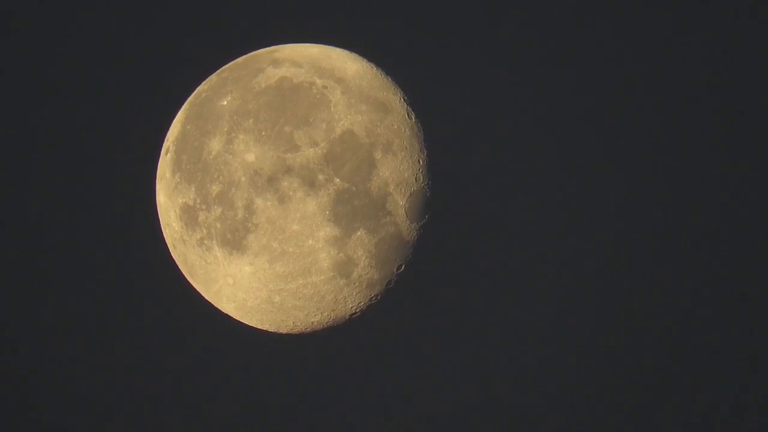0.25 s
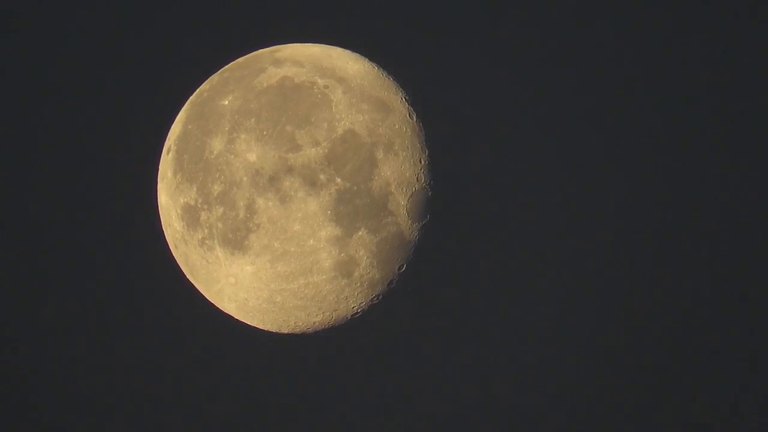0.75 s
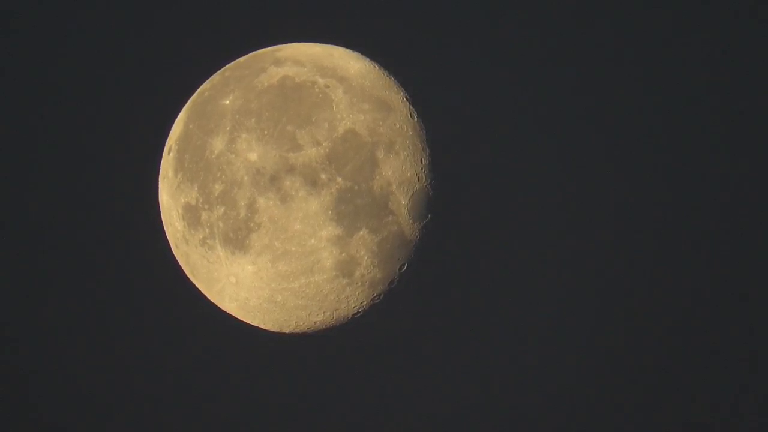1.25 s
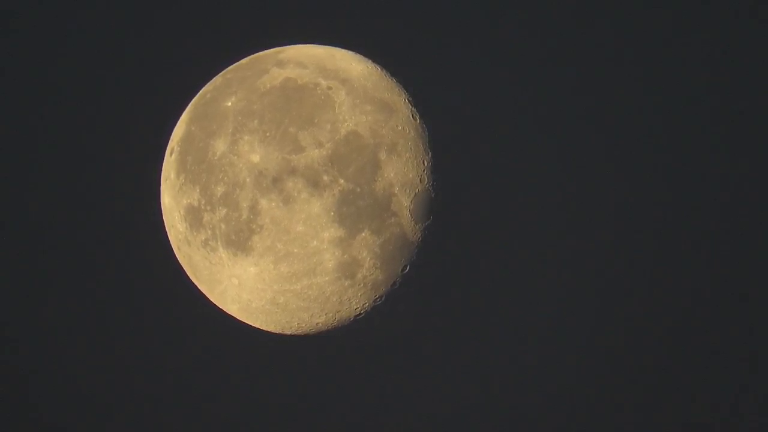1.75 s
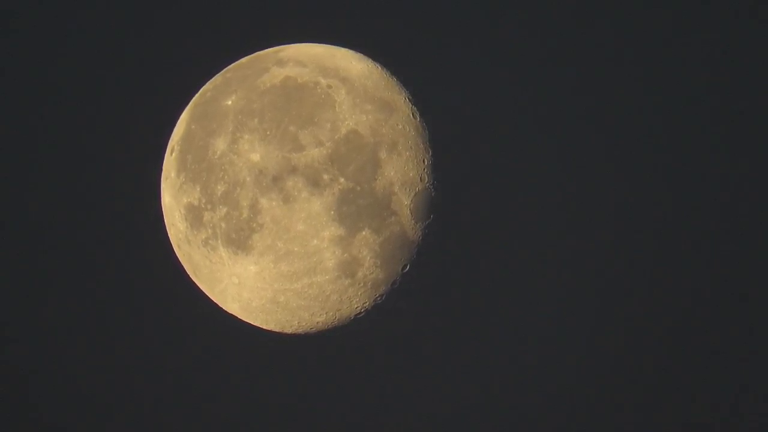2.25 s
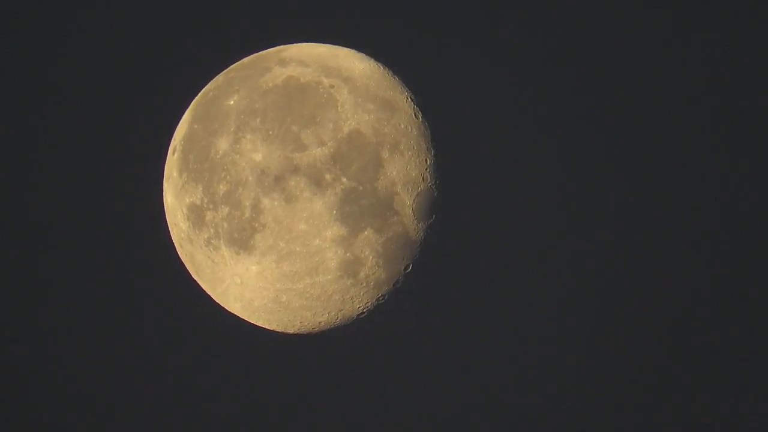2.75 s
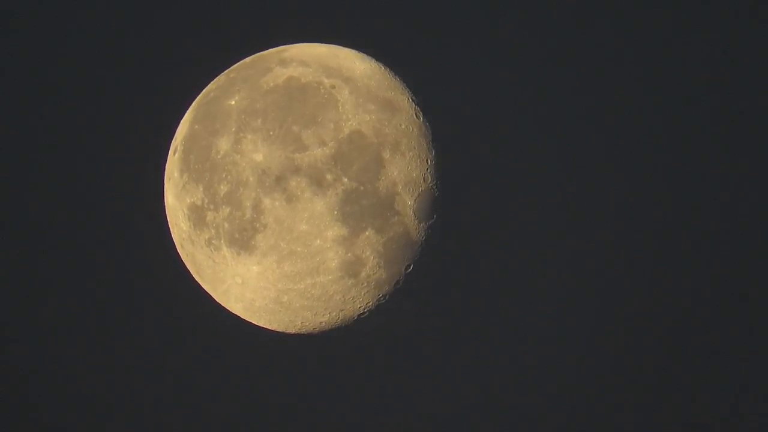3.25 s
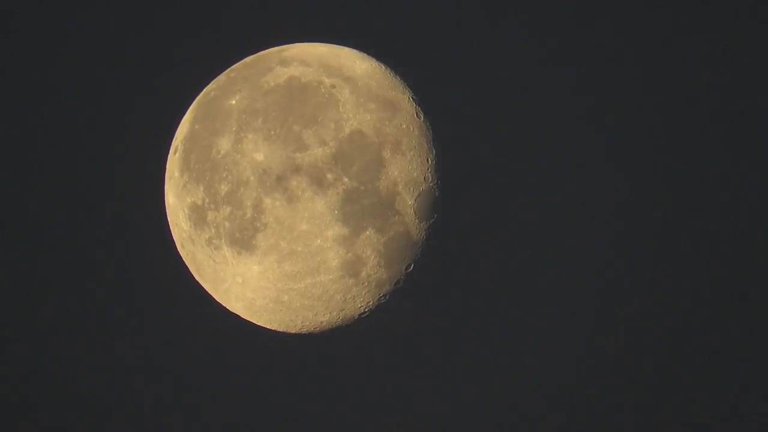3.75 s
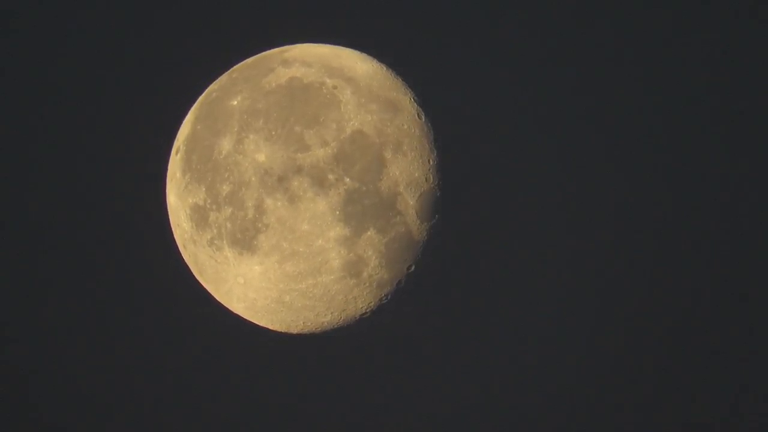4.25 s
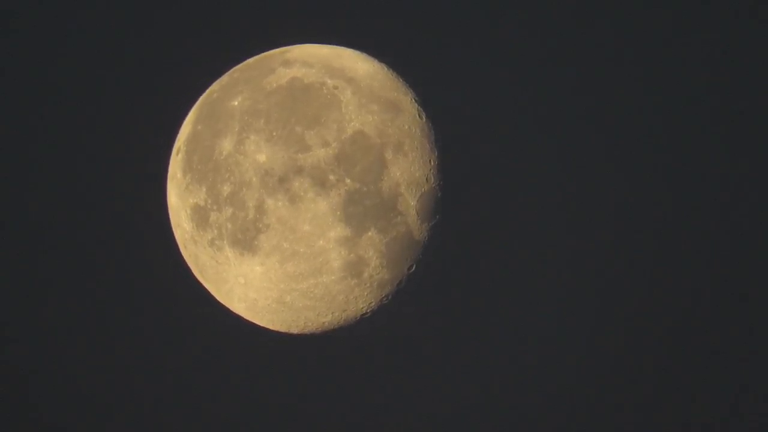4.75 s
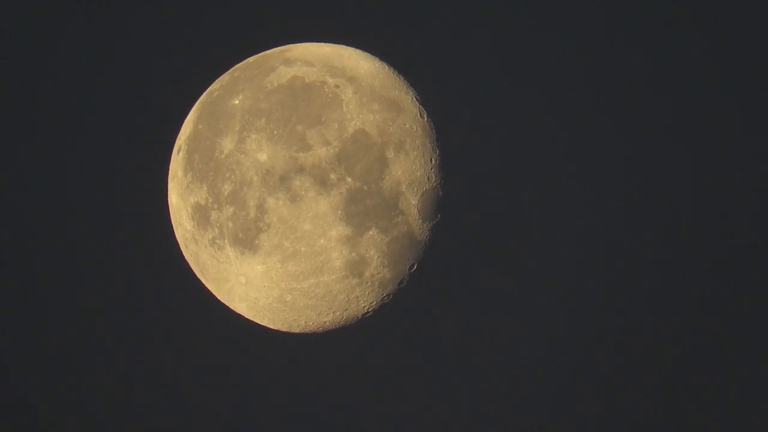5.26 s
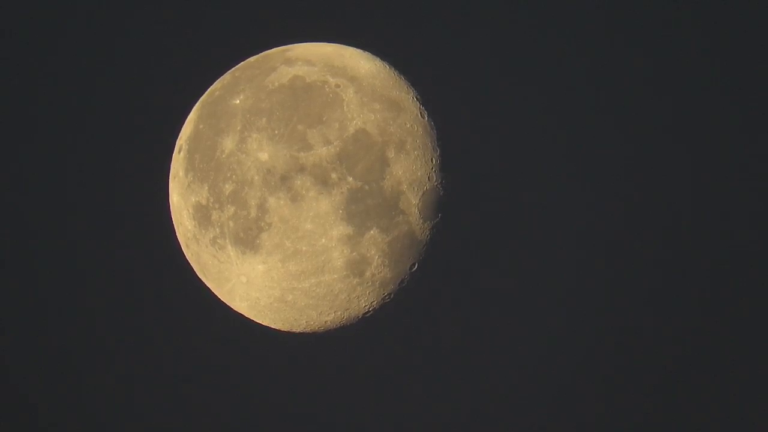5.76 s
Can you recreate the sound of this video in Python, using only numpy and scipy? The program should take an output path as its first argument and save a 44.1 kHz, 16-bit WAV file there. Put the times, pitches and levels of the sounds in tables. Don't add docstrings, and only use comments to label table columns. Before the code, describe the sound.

After a tiny silence, the low, broad hum of far town traffic opens quickly and continues throughout: soft rumble, tyre roar and faint hiss, without distinct vehicles. A gull calls at about 0.7, 1.5, 2.5, 4.2 and 5.8 seconds. Each call is a clear, whistling yelp under a fifth of a second long, sliding up around 2.3 to 2.7 kHz, breaking to about 3 kHz, then dropping towards 2 kHz. House fronts return it within half a second as fainter, slightly higher, smeared copies, and a streaky reverberant haze hangs on for a second or more. The third call is weaker; the fourth has a strong early echo. At 4.9 seconds a hard, dry knock of several almost merged taps clicks nearby with a brief ring. Traffic swells slightly around 5.2 seconds, eases, and rises again as the faint last call ends the scene at 6 seconds.

```python
import sys
import numpy as np
from scipy import signal
from scipy.fft import rfft, irfft
from scipy.io import wavfile
from scipy.ndimage import uniform_filter1d

SR = 44100
rng = np.random.default_rng(int(sys.argv[2]) if len(sys.argv) > 2 else 0)


def inscribe(sig):
    pcm = np.round(np.clip(np.atleast_2d(sig).T, -1, 1) * 32767)
    wavfile.write(sys.argv[1], SR, pcm.astype(np.int16))


def invert_db(x):
    u = np.asarray(x, float) / 20
    return 10 ** u


N = 264908

# multiples of the pitch curve, strength toward walls/dB, change from mid-part to its end/dB
CALL_PARTS = [
    ((1, 1.5, 2, .5), (0.5, -5, -24.5, -14), (7.3, -0.5, 4, -2)),
    ((1, 2), (0.19, -22), (-4, 4)),
    ((1, 1.5, 2, 2.5), (-0.5, -11, -22, -27), (-4.5, -1, -3, 4)),
]
# (level/dB, loudest at share of part, loss/dB)
STRAIGHT_VOICE = [
    (0.94, 30, [(-4, 0.44, 82), (-23, 0.63, 40), (-3.5, 0.55, 37)]),
    (2.0, 53, [(-18.5, 0.65, 30)]),
    (1.15, 21, [(-14, 0.22, 25), (-25, .05, 61), (-28.5, 0.59, 70)]),
]


def gull():
    # start t/s, voice breaks up t/s, drops back t/s, end t/s
    call_times = [
        (.674, .72, .771, .834),
        (1.492, 1.539, 1.609, 1.7),
        (2.53, 2.592, 2.648, 2.7),
        (4.238, 4.284, 4.356, 4.405),
        (5.782, 5.833, 5.876, 5.91),
    ]
    # from f/Hz, to f/Hz, level/dB, loudest at share of part, other partials/dB
    rises = [(2403, 2630, -47.5, 0.78, -0.5), (2325, 2660, -46, 0.91, 1), (2290, 2660, -49.5, 1, -3),
             (2314, 2690, -47.5, 0.9, 0), (2360, 2700, -49, 1, -8)]
    # from f/Hz, to f/Hz, level/dB, loudest at share of part, other partials/dB
    tops = [(3100, 2900, -43, 0.74, -1.5), (3196, 2800, -47, 0.46, -7), (3106, 2900, -63, .4, 7.),
            (3257, 2880, -47, .3, 0.5), (3220, 2950, -59.5, .65, 4.)]
    # from f/Hz, to f/Hz, level/dB, loudest at share of part, other partials/dB
    falls = [(2357, 2135, -44, 0.65, 0), (2300, 1990, -40.5, 0.062, -1.5), (2396, 2135, -50.5, .75, 0),
             (2280, 2095, -40.5, .0, -8.), (2420, 2170, -59, .4, -1.5)]
    direct = np.zeros(N)
    calls = []
    for times, *rows in zip(call_times, rises, tops, falls):
        parts = glides(times, *rows)
        calls.append(parts)
        cry(direct, parts, rows)
    near = tail(.3, [(2000, 0.78), (6000, 0.18)], onset=0.0053, same=.4)
    ground = invert_db(-13) * signal.oaconvolve(direct[None], near, axes=1)[:, :N]
    walls = house_fronts(calls, [top[3] for top in tops])
    straight = placed(direct, pan_db=1.5, lag=0.1)
    return straight + ground + placed(walls, pan_db=-1.0, lag=1.26) + streets(calls)


def glides(times, *rows):
    scoops_hz = [
        0,
        110.,
        0,
    ]
    overlap_s = 0.0049
    scoop_share = 0.083
    collapse_hz, collapse = 2130, 2.5
    u = np.linspace(0, 1, 17)
    curves = []
    for a, b, row, (bend, *_), scoop_hz in zip(times, times[1:], rows, STRAIGHT_VOICE, scoops_hz):
        s = a + u * (b - a + overlap_s)
        hz = row[0] + (row[1] - row[0]) * u ** bend
        hz = hz - scoop_hz * np.exp(-u / scoop_share)
        hz = hz - collapse * np.maximum(collapse_hz - hz, 0)
        curves.append(np.transpose([s, hz]))
    return curves


def cry(direct, parts, rows):
    for row, glide, (multiples, *_), (_, lost_db, others) in zip(rows, parts, CALL_PARTS, STRAIGHT_VOICE):
        *_, level_db, peak, rich_db = row
        s, hz = glide.T
        t = np.arange(s[0], s[-1], 1 / SR)
        u = np.linspace(0, 1, len(t))
        dbs = [level_db - lost_db * (u - peak) ** 2]
        for db, at, lost in others:
            dbs.append(level_db + rich_db + db - lost * (u - at) ** 2)
        tone = note(np.interp(t, s, hz), multiples, dbs)
        add(direct, s[0], tone * signal.windows.tukey(len(t), .18))


def note(hz, multiples, dbs, wobble=0.0036):
    flutter_db = 1.6
    chance = rng.standard_normal((5, 8000))
    drift = evened(uniform_filter1d(chance[0], 150))
    hz = hz * (1 + wobble * drift[:len(hz)])
    flicker = uniform_filter1d(uniform_filter1d(chance[1:], 250), 250)[:, :len(hz)]
    turns = np.cumsum(hz) / SR
    tone = np.zeros(len(hz))
    for k, db, f in zip(multiples, dbs, flicker):
        level = invert_db(db + flutter_db * evened(f - f.mean()))
        tone += level * np.sin(2 * np.pi * k * turns)
    return np.sqrt(2) * tone


def house_fronts(calls, top_peaks):
    # delay t/s, pitch factor, rise level/dB, top level/dB, fall level/dB
    fronts = [
        [(.11, 1.0, -58, -53, -58), (.195, 1.0, -61, -55, -60), (.236, 1.04, -52.5, -47, -48.5),
         (.262, 1.05, -54, -49.5, -56), (.46, 1.02, -55, -56, -56.5)],
        [(.11, 1.1, -61, -65, -55), (.194, 1.03, -54, -53, -55), (.228, 1.04, -52.5, -50, -52),
         (.444, 1.04, -56, -60, -57)],
        [(.12, 1.01, -59, -65, -58), (.17, 1.03, -58.5, -57, -53), (.195, 1.04, -54, -49, -52),
         (.33, 1.01, -58, -68, -57), (.41, 1.04, -59, -65, -53.5)],
        [(.055, 1.02, -63, -56, -51), (.111, 1.04, -47.5, -39.5, -49.5), (.148, 1.02, -59, -59, -54),
         (.3, 1.01, -71, -61.5, -62), (.37, 1.03, -60, -66, -62)],
        [(.07, 1.038, -74, -67, -68)],
    ]
    walls = np.zeros(N)
    for parts, peak, echoes in zip(calls, top_peaks, fronts):
        fade_db = -2.5 + 25 * (peak - .5)
        for delay, shift, *dbs in echoes:
            bounced = sent(parts, shift, dbs, fade_db)
            echo = signal.fftconvolve(bounced, ledges(smear=.07 * delay))
            add(walls, parts[0][0][0] + delay, echo)
    return walls


def sent(parts, shift, dbs, fade_db=0.0):
    sag_hz = 2140
    first, out = parts[0][0][0], np.zeros(SR // 4)
    for glide, (multiples, toward_db, swell_db), db, fade in zip(parts, CALL_PARTS, dbs, (0, fade_db, 0)):
        s, hz = np.transpose(glide)
        t = np.arange(s[0], s[-1], shift / SR)
        along = np.linspace(-1, 1, len(t))
        pitch = np.interp(t, s, hz)
        levels_db = db + fade * along + np.array(toward_db)[:, None] + np.outer(swell_db, along)
        levels_db = levels_db - 0.054 * np.maximum(sag_hz - pitch, 0)
        tone = note(shift * pitch, multiples, levels_db)
        add(out, (s[0] - first) / shift, tone * signal.windows.tukey(len(t), .4))
    return out


def ledges(smear):
    fade = np.exp(-np.arange(4000) / SR / max(smear, .002))
    taps = rng.standard_normal(4000) * (rng.random(4000) < .02) * fade
    taps[0] = 1.8
    return taps / np.linalg.norm(taps)


def streets(calls):
    shifts = (.97, .99, 1.01, 1.03, 1.045)
    # delay t/s, rise level/dB, top level/dB, fall level/dB
    tails = [(.21, -53, -52.5, -52.5), (.19, -53.5, -53, -53), (.18, -54.5, -57.5, -50),
             (.12, -56, -55, -54), (.06, -67, -66, -66)]
    # f/Hz, time to fall 60 dB t/s
    ringing = [(1200, 2.4), (2400, 2.6), (3300, 2.3), (4500, 1.2), (7000, .5)]
    out = np.zeros((2, N))
    for shift in shifts:
        feed = np.zeros(N)
        for parts, (delay, *dbs) in zip(calls, tails):
            add(feed, parts[0][0][0] + delay, sent(parts, shift, dbs))
        far = tail(1.2, ringing, onset=0.031, same=0.31)
        chance = rng.standard_normal(far.shape[1])
        lumps = evened(uniform_filter1d(uniform_filter1d(chance, 500), 500))
        far = far * invert_db(4.5 * np.clip(lumps, -2, 2) - 9)
        out += signal.oaconvolve(feed[None], far, axes=1)[:, :N]
    return out


def knock():
    # t/s, level/dB
    tap_times = [
        (4.873, -42),
        (4.877, -40.5),
        (4.88, -39),
        (4.886, -45),
        (4.906, -49),
    ]
    # f/Hz, level per Hz/dB
    tap_colour = [(500, -28), (1000, -18), (1450, 4), (2200, -5), (3600, -6), (5400, -14.5), (6400, -23),
                  (7500, -40), (22000, -90)]
    taps = np.zeros(N)
    fade = np.exp(-np.arange(400) / SR / 0.0034)
    for s, db in tap_times:
        add(taps, s, invert_db(db) * evened(rng.standard_normal(400)) * fade)
    grid = np.linspace(0, 1, 129)
    gains = invert_db(2 * read(tap_colour, grid * SR / 2))
    colour = signal.minimum_phase(signal.firwin2(255, grid, gains))
    taps = signal.oaconvolve(taps, colour / np.linalg.norm(colour))[:N]
    ring = tail(.3, [(1500, 0.31), (6000, .2)], onset=.004, same=0.56)
    ringing = signal.fftconvolve(taps[None], ring, axes=1)[:, :N]
    return placed(taps, pan_db=2.0, lag=-.6) + invert_db(-4.0) * ringing


def town():
    # f/Hz, level per Hz/dB
    common = [(15, -60), (30, -36), (45, -22.5), (70, -13), (110, -8.5), (180, -8), (260, -12.5),
              (500, -16.5), (800, -16), (1000, -18.5), (1340, -22), (2230, -28), (12300, -53.5),
              (14900, -62)]
    # f/Hz, level per Hz/dB
    difference = [(15, -50), (30, -35), (60, -23), (125, -10.5), (224, -2), (343, -3.5), (400, 0.5),
                  (513, -7.5), (974, -11), (2620, -23), (3330, -24.5), (12000, -41.5), (14900, -49)]
    # f/Hz, width f/Hz, level/dB
    drones = [(60, 10, 5), (127, 24, 7), (155, 18, 5), (223, 20, 10), (295, 30, 4), (447, 28, 6),
              (650, 50, 3), (757, 36, 6), (930, 60, 4), (1170, 210, 7), (1240, 10, 4)]
    # t/s, level/dB
    swell = [
        (0.24, -48.5),
        (0.53, -50),
        (1.94, -48.5),
        (2.12, -49),
        (4.86, -49),
        (5.16, -46),
        (5.71, -48),
        (6.0, -47),
    ]
    follow = [
        0.12,
        1.0,
        0.27,
    ]
    frames, hz = N // 1024 + 5, np.fft.rfftfreq(4096, 1 / SR)
    a, b, c, d, patches = rng.standard_normal((frames, 2049, 5)).T
    patches = evened(uniform_filter1d(uniform_filter1d(patches, 50, 0), 4, 1))
    flicker = np.tanh(rng.standard_normal(frames))
    s, swell_db = np.transpose(swell)
    t = np.arange(frames) * 1024 / SR
    drift = np.outer(follow, np.interp(t, s, swell_db - swell_db.mean()))
    share = np.array([read(list(zip((250, 600, 5000), row)), hz) for row in np.eye(3)])
    drones_db = sum(db / (1 + (2 * (hz - f) / w) ** 2) for f, w, db in drones)
    field_db = share.T @ drift
    field_db = field_db + 1.01 * patches * (1 - 0.65 * share[0])[:, None]
    field_db = field_db + 0.93 * flicker * share[1:].sum(0)[:, None]
    both = []
    for z, db in ((a + 1j * b, read(common, hz) + drones_db), (c + 1j * d, read(difference, hz))):
        noise = signal.istft(z * invert_db(db[:, None] + field_db), nperseg=4096, noverlap=3072)[1]
        both.append(evened(noise[:N]))
    mid, side = both[0], invert_db(-6.5) * both[1]
    return invert_db(-43.5) * np.array([mid + side, mid - side])


def tail(seconds, t60s, onset, same):
    a, b = rng.standard_normal((2, round(seconds * SR)))
    hz, t, z = signal.stft([a + same * b, a - same * b], SR, nperseg=256)
    decay = invert_db(-60 * t / read(t60s, hz)[:, None])
    z = z * decay * np.clip(t / onset, 0, 1)
    out = signal.istft(z, SR, nperseg=256)[1]
    return out / np.linalg.norm(out[0])


def placed(x, pan_db, lag):
    turn = np.exp(-1j * np.pi * lag * np.fft.rfftfreq(N))
    z = rfft(x)
    left = invert_db(pan_db / 2) * irfft(z * turn, N)
    right = invert_db(-pan_db / 2) * irfft(z / turn, N)
    return np.array([left, right])


def add(mix, s, sound):
    part = mix[..., round(s * SR):][..., :sound.shape[-1]]
    part += sound[..., :part.shape[-1]]


def evened(x):
    return x / np.sqrt(np.mean(x ** 2) + 1e-20)


def read(points, hz):
    f, value = np.transpose(points)
    return np.interp(np.log(hz + 1), np.log(f + 1), value)


def scene():
    return gull() + knock() + town()


def roll_off(x):
    return signal.sosfilt(signal.butter(12, 15030, fs=SR, output="sos"), x)


def record(dry):
    start_s, fade_s = .037, .008
    opening = np.clip((np.arange(N) / SR - start_s) / fade_s, 0, 1)
    return roll_off(dry * opening)


dry = scene()
out = record(dry)
inscribe(out)
```